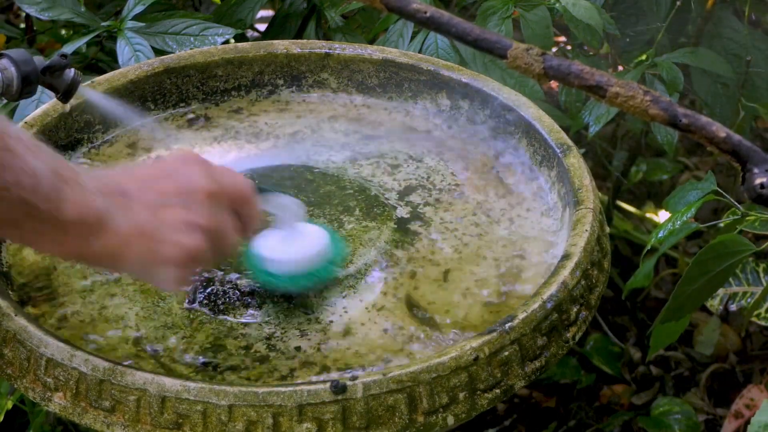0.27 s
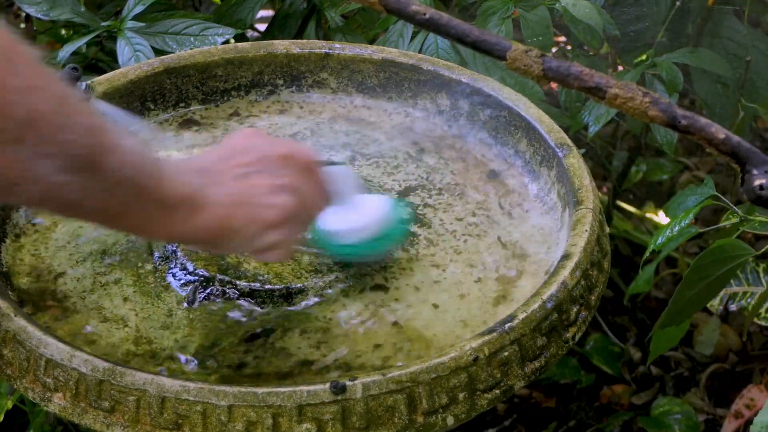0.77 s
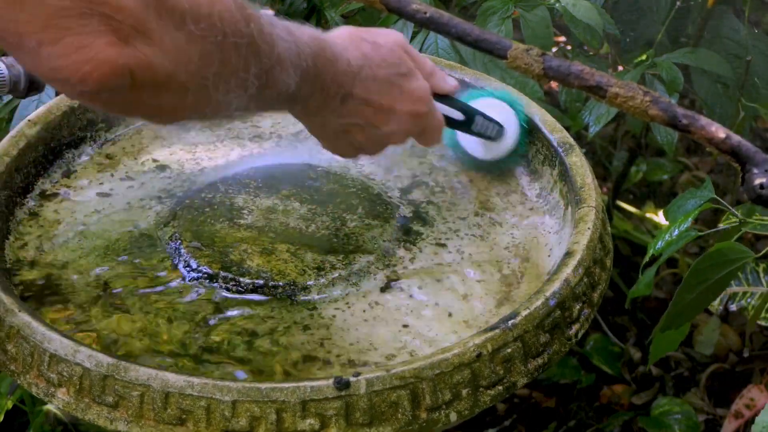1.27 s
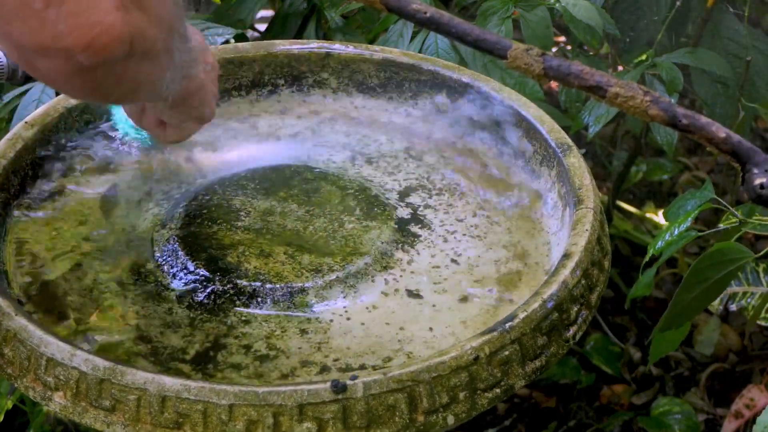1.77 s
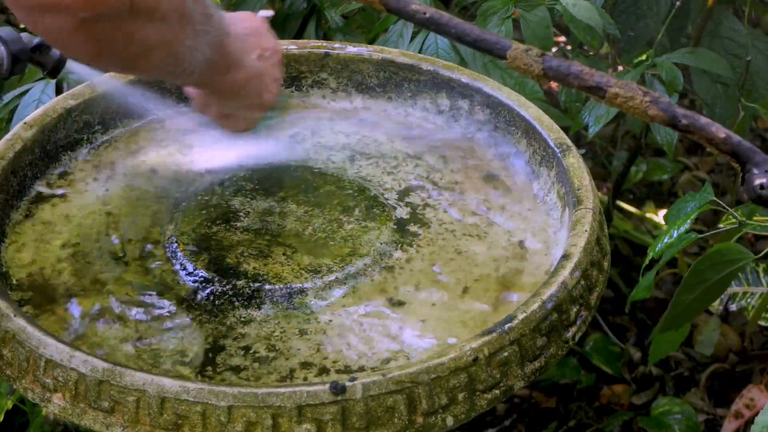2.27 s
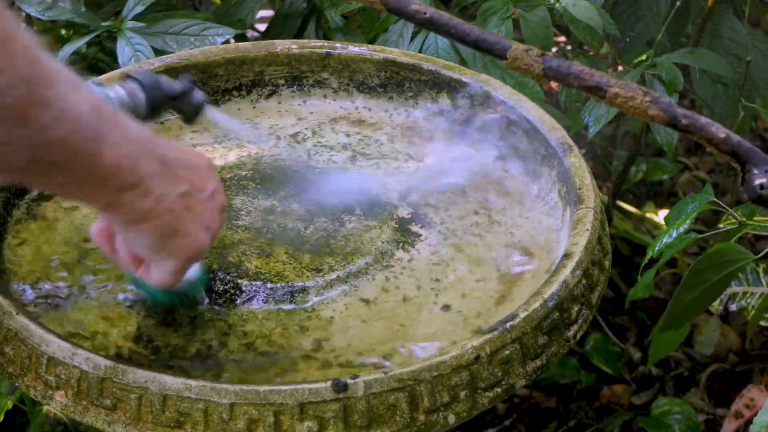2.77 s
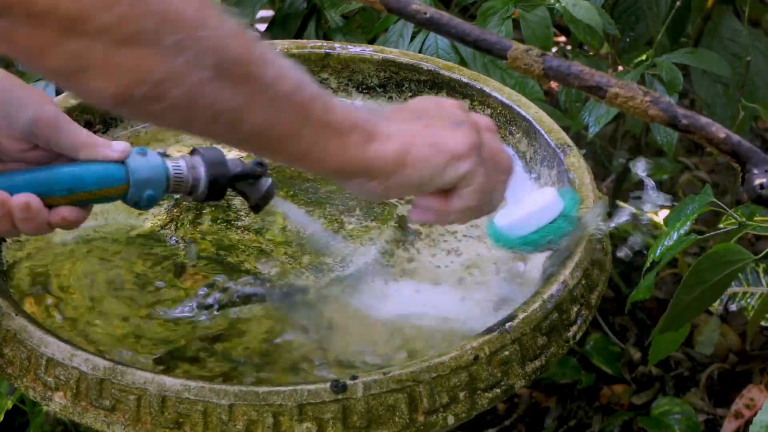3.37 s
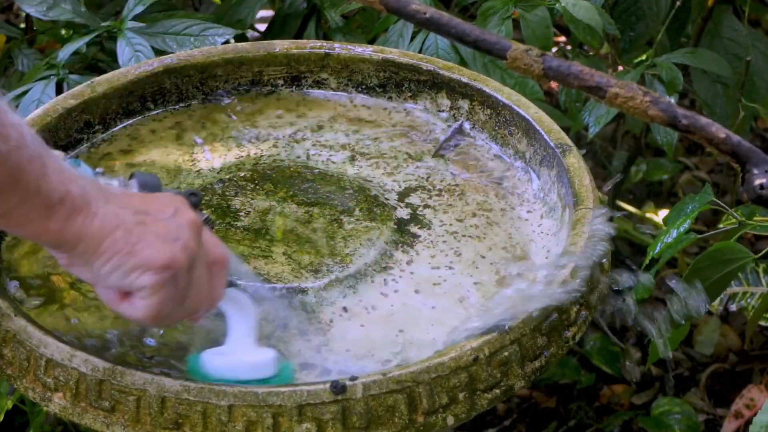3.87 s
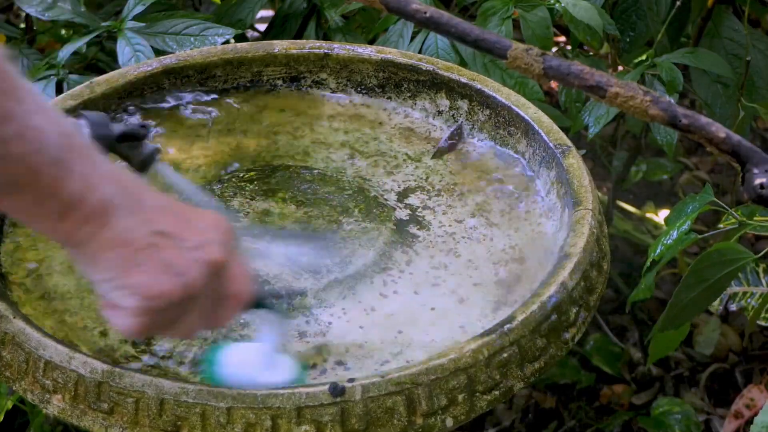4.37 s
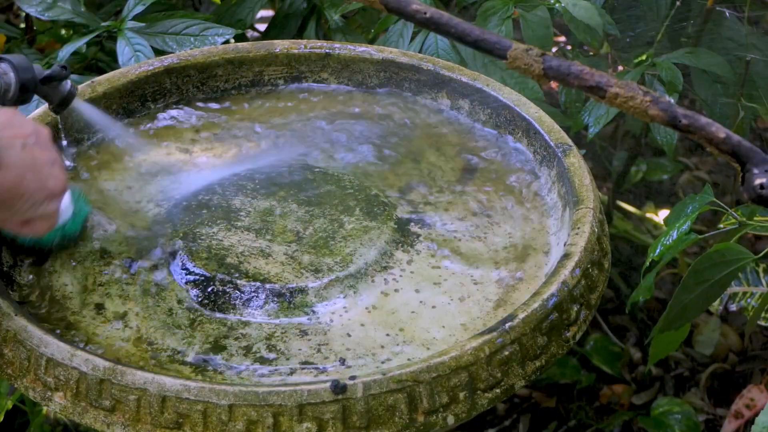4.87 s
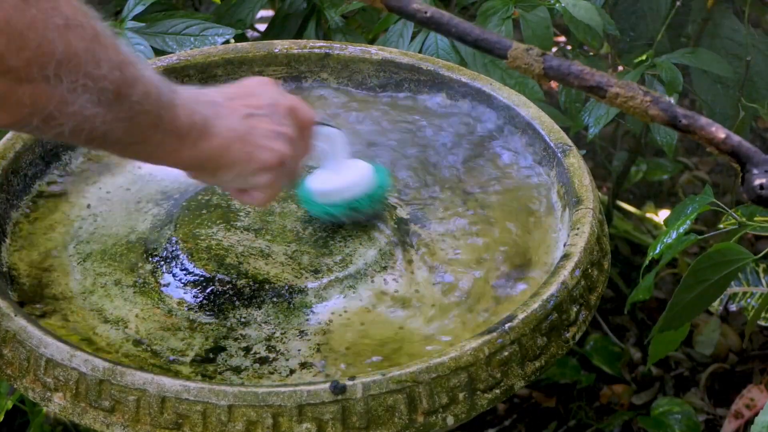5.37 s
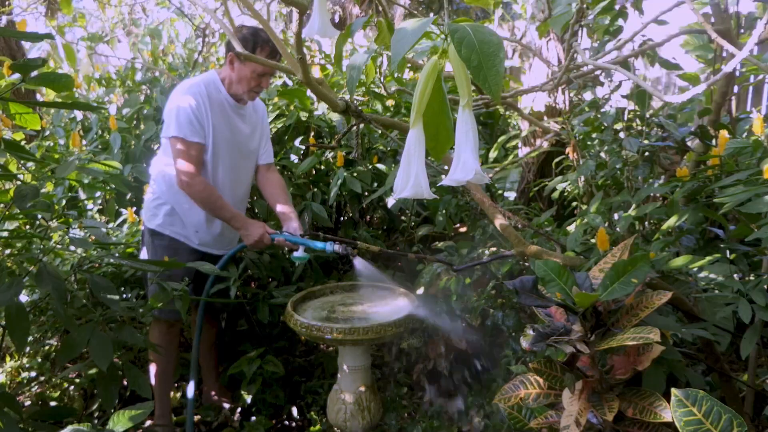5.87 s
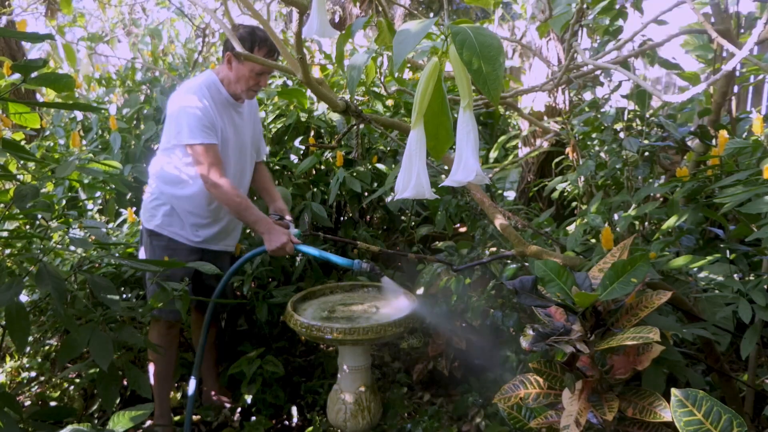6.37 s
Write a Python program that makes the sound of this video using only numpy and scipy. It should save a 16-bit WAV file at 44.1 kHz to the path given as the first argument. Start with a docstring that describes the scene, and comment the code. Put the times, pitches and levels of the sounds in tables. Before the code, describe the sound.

A hose jet hisses and splashes into a shallow concrete basin while a wet brush scrubs and knocks, then a smoother spray takes over.

```python
"""Hosing and scrubbing a bird bath

A garden, one microphone close to a shallow concrete basin. A hose jet hisses and crackles on the stone,
the pool fizzes, and a wet hand brush rasps, bumps and knocks. Near the end all this gives way at once to
a smoother, fuller spray fanning over the rim. Far behind lie a low murmur of air and a motor's hum."""
import sys
import numpy as np
from scipy import signal
from scipy.fft import rfft, irfft, next_fast_len
from scipy.io import wavfile
from scipy.ndimage import uniform_filter1d

SR = 44100
rng = np.random.default_rng(int(sys.argv[2]) if len(sys.argv) > 2 else 0)


def unload_wav(signal):
    """Save mono or channel-first audio to the path in sys.argv[1] as 16-bit WAV at rate SR, clipped to [-1, 1]."""
    wavfile.write(
        sys.argv[1],
        SR,
        np.round(np.clip(np.atleast_2d(signal).T, -1, 1) * 32767).astype(np.int16),
    )


N = 291501
T = np.arange(N) / SR

# spectrum of the jet on the stone: (frequency [Hz], relative density [dB])
JET_SPECTRUM = [(600, -32), (1100, -21.5), (1500, -13), (2000, -13), (3200, -9.5), (4500, -3.5), (5000, -3),
                (6300, 1.5), (7100, 0), (7900, -3.5), (8900, 0.9), (11400, -0.5), (14300, -8.5),
                (16000, -9.5)]
# resonances of the plastic brush head: (frequency [Hz], width [Hz], relative gain [dB])
HEAD_MODES = [(900, 67, -11), (1410, 120, -6), (1670, 150, -3.5), (2500, 430, -15), (3025, 150, -1),
              (3555, 180, 3), (4420, 130, -4), (4780, 260, 1.5), (5800, 170, 2), (6460, 380, 3)]


def undb(db):
    """Decibels to gain."""
    return 10 ** (np.asarray(db) / 20)


def unit(x):
    """Scale to rms 1."""
    return x / np.sqrt(np.mean(x ** 2) + 1e-18)


def curves(table):
    """Each column after the first (time [s]) as a signal."""
    times, *columns = np.transpose(table)
    return [np.interp(T, times, column) for column in columns]


def walk(rate):
    """Random drift of rms 1, turning about rate times a second."""
    hold = max(int(SR / rate), 1)
    steps = np.repeat(rng.standard_normal(N // hold + 1), hold)
    return unit(uniform_filter1d(steps, hold)[:N])


def tone(hz):
    """A sine that wavers a little in pitch; rms 1."""
    pitch = hz * (1 + 0.01257 * walk(rate=12))
    return unit(np.sin(2 * np.pi * np.cumsum(pitch) / SR))


def shape(x, gain):
    """Filter by a gain that is a function of frequency."""
    size = next_fast_len(len(x) + 2048)
    hz = np.fft.rfftfreq(size, 1 / SR) + 1
    return irfft(rfft(x, size) * gain(hz), size)[:len(x)]


def colour(x, spectrum):
    """Filter by (frequency [Hz], gain [dB]) points; rms 1."""
    hz, db = np.transpose(spectrum)
    return unit(shape(x, lambda f: undb(np.interp(np.log(f), np.log(hz), db))))


def resonance(f, hz, width_hz):
    """Complex gain at f of one mode centred on hz."""
    return 1 / (1 + 1j * (f / hz - hz / f) * hz / width_hz)


def ringing(x, modes, direct):
    """A body's modes (frequency [Hz], width [Hz], gain [dB]) plus a share of direct sound; rms 1."""
    def body(f):
        return direct + sum(undb(db) * resonance(f, hz, width) for hz, width, db in modes)
    return unit(shape(x, body))


def flicker(x, depth_db, rate):
    """Narrow bands swell and fade on their own, as when a sheet of water breaks up; rms 1."""
    size = 512
    _, _, bands = signal.stft(x, nperseg=size)
    frames = max(int(2 * SR / size / rate), 1)
    drift = uniform_filter1d(rng.standard_normal(bands.shape), frames, axis=1)
    drift = unit(uniform_filter1d(drift, size=2, axis=0))
    _, flickering = signal.istft(bands * undb(depth_db * drift), nperseg=size)
    return unit(flickering[:len(x)])


def impacts(rate, spread_db):
    """Tiny random hits, rate a second, with sizes scattered in dB; rms 1."""
    hit = rng.random(N) < rate / SR
    size = undb(spread_db * np.clip(rng.standard_normal(N), -2.5, 2.5))
    return unit(hit * size * rng.choice([-1, 1], N))


def drops(rate, spread_db, burst_s):
    """Each drop bursts into a very short puff of droplets; rms 1."""
    puff = np.exp(-T[:1024] / burst_s)
    power = signal.fftconvolve(impacts(rate, spread_db) ** 2, puff)[:N]
    return unit(np.sqrt(np.abs(power)) * rng.standard_normal(N))


def swells(rows, source):
    """Bands of source swell and fade: (middle [s], length [s], level [dB], centre [Hz], width [Hz])."""
    out = np.zeros(N)
    for middle, length, db, hz, width_hz in rows:
        span = np.flatnonzero(np.abs(T - middle) < 1.5 * length)
        swell = np.exp(-np.abs(2 * (T[span] - middle) / length) ** 3)
        band = shape(source[span], lambda f: resonance(f, hz, 2 * width_hz) ** 2)  # steep skirts
        out[span] += undb(db) * swell * unit(band)
    return out


def jet():
    """Mist hisses evenly; the harder the jet hits the stone, the more single drops crackle."""
    # the jet wanders: loud and bright on bare stone, softer and splashier in the pool and by the rim
    # (time [s], hiss level [dB], splash relative to hiss [dB])
    jet_levels = [(0, -35.5, -2.5), (.17, -35, -4.5), (.47, -36.5, -4.3), (.78, -35.5, -4.5),
                  (1, -38, -1.5), (1.35, -38.5, -1.5), (1.67, -36, -2), (1.75, -32.2, -5),
                  (2.45, -31.5, -4.5), (3.1, -39.5, 0.5), (3.42, -34.5, -2.5), (3.75, -37, 0.1),
                  (4.4, -41, 1.3), (4.72, -34.5, -5), (5.23, -35.5, -1.5), (5.5, -39, -1.5),
                  (5.85, -39, .5)]
    # the bowl tints the water: (frequency [Hz], width [Hz], relative gain [dB])
    bowl_modes = [(1680, 29, -1.5), (3130, 110, -4), (4400, 97, -20), (9800, 150, -26)]
    hiss_db, splash_db = curves(jet_levels)
    force = np.clip(0.37 + 0.041 * (hiss_db + 30), .1, .9)
    mist = flicker(rng.standard_normal(N), depth_db=3.0, rate=35)
    crackle = drops(rate=1200, spread_db=4, burst_s=0.00061)
    crackle = unit(shape(crackle, lambda f: 1 / np.hypot(1, (f / 12500) ** 3)))  # duller than the mist
    water = colour(np.sqrt(1 - force) * mist + np.sqrt(force) * crackle, JET_SPECTRUM)
    water = ringing(water, bowl_modes, direct=1)
    water *= undb(0.72 * walk(rate=40))  # the stream breaks into uneven slugs
    splash = shape(water, lambda f: 1 / (1 + (f / 7700) ** 10))
    hiss = water - splash
    splash_gain = undb(hiss_db + splash_db + .5 * walk(rate=25))
    return unit(hiss) * undb(hiss_db) + unit(splash) * splash_gain


def bubbles(count, low_hz, high_hz, decay_cycles, spread_db, glide):
    """Bubbles in the shallow pool ring briefly and rise in pitch as they surface; rms 1."""
    out = np.zeros(N)
    for when, smallness, strength in rng.random((count, 3)):
        hz = low_hz * (high_hz / low_hz) ** smallness
        start = int(when * N)
        samples = min(int(5 * decay_cycles / hz * SR), N - start)
        age = T[:samples] * hz / decay_cycles  # in decay times
        ring = np.exp(-age) * np.sin(2 * np.pi * decay_cycles * age * (1 + glide * age))
        out[start:start + samples] += undb(-spread_db * np.log(strength + 0.046)) * ring
    return unit(out)


def garden():
    """Far from the microphone: murmuring air, a motor's wavering hum, a drone that comes and goes."""
    # still garden air: (frequency [Hz], relative density [dB])
    air_spectrum = [(22, -10), (33, -14), (45, -6.5), (75, -1), (135, 0.5), (180, -3.5), (260, -0.5),
                    (340, 0), (430, -4.5), (650, -5), (850, -2.5), (1400, -5.5), (3000, -16.5)]
    # tones of the distant motor: (frequency [Hz], level [dB])
    motor_tones = [(120, -75.5), (353, -76), (511, -75.5)]
    # rise and fall of the low drone: (time [s], level [dB])
    drone_levels = [(0, -74), (.65, -77), (1.58, -67), (2.2, -77), (2.7, -63), (3.2, -75), (3.75, -65),
                    (4.5, -69), (5.4, -76), (6.6, -85)]
    air = colour(rng.standard_normal(N), air_spectrum) * undb(-56 + 2.1 * walk(rate=9.7))
    hum = sum(undb(db + 1.3 * walk(rate=4.32)) * tone(hz) for hz, db in motor_tones)
    drone_db, = curves(drone_levels)
    drone = undb(drone_db + 3.2 * walk(rate=6)) * tone(hz=95.5)
    return air + hum + drone


def brush():
    """Bristles flick on rough concrete and ring the head; water among them tunes the rasp and gurgles."""
    # brush strokes: (middle [s], length [s], level [dB], centre of the rasp [Hz])
    strokes = [(.108, 0.084, -37, 3300), (0.274, 0.062, -33, 4800), (0.384, .064, -30, 3600),
               (0.553, .09, -33.5, 4140), (0.677, 0.088, -32, 3500), (.79, .075, -37, 3820),
               (0.869, 0.072, -40.5, 3220), (1.405, 0.21, -46, 1770), (1.752, 0.063, -42.5, 3300),
               (3.057, 0.048, -49, 3200), (3.202, .07, -42, 3500), (4.295, 0.073, -43, 3050),
               (5.053, .035, -39, 1980), (5.1, .041, -38.5, 4040), (5.21, 0.12, -46, 2900),
               (5.506, 0.18, -43.5, 2460), (5.712, 0.11, -41, 2240), (5.81, 0.043, -41.5, 2820)]
    # water pushed by the brush: (middle [s], length [s], level [dB], pitch [Hz])
    gurgles = [(1.98, 0.12, -45.5, 2410), (3.558, .09, -50, 1390), (3.639, .027, -45.5, 1440),
               (4.11, 0.17, -55, 1460), (5.232, .04, -44.5, 1430), (5.36, 0.022, -43, 2240),
               (5.399, 0.046, -48, 2620)]
    flicks = impacts(rate=3000, spread_db=1.5) + .5 * rng.standard_normal(N)
    flicks = shape(flicks, lambda f: 1 / np.hypot(1, (1250 / f) ** 6))  # thin bristles carry no bass
    bristles = ringing(flicker(flicks, depth_db=3.5, rate=30), HEAD_MODES, direct=1.0)
    # harder pressed bristles widen the rasp
    rasp_bands = [(s, length, db, hz, 0.39 * hz * 2 ** (0.04 * (db + 41)))
                  for s, length, db, hz in strokes]
    gurgle_bands = [(s, length, db, hz, 0.12 * hz) for s, length, db, hz in gurgles]
    return swells(rasp_bands + gurgle_bands, bristles)


def spatters():
    """Dense hard drops fly where the jet meets the brush or the rim."""
    # bursts of spatter: (middle [s], length [s], level [dB], centre [Hz])
    bursts = [(.26, .02, -29, 6500), (0.552, 0.064, -29.5, 8400), (2.052, 0.14, -30, 7800),
              (2.27, .02, -29, 9500), (3.476, .04, -30.5, 8000), (3.873, 0.12, -32.5, 7000),
              (4.056, 0.1, -32, 6740), (4.21, 0.071, -36.5, 7400), (4.785, 0.14, -32, 7900),
              (5.042, 0.039, -32, 7000), (5.106, 0.043, -29.5, 8500), (5.235, 0.066, -30.5, 7600)]
    hits = drops(rate=2200, spread_db=5.0, burst_s=0.00037) + 0.75 * rng.standard_normal(N)
    bands = [(s, length, db, hz, 0.84 * hz) for s, length, db, hz in bursts]
    return swells(bands, colour(hits, JET_SPECTRUM))


def bumps():
    """The brush thuds softly against the basin as it turns; the last, higher one is a small plop of water."""
    # dull thuds, the last a water plop: (middle [s], length [s], level [dB], centre [Hz])
    thuds = [(0.75, .039, -56, 267), (1.285, .03, -51, 248), (4.206, 0.028, -53.5, 830)]
    width_hz = 51
    return swells([(*thud, width_hz) for thud in thuds], rng.standard_normal(N))


def knocks():
    """The plastic head hits the basin and rings briefly, its contact spread out by wet bristles."""
    # blows of the head: (time [s], peak level [dB])
    blows = [(3.201, -27.5), (3.53, -30), (3.614, -20.5), (5.812, -34)]
    age = T[:SR // 8]
    out = np.zeros(N)
    for s, db in blows:
        contact = rng.standard_normal(len(age)) * age * np.exp(-age / 0.0024)
        contact = shape(contact, lambda f: 1 / (1 + 1j * (f / 4000 - 700 / f)))
        ring = ringing(contact, HEAD_MODES, direct=0.13)
        start = int(s * SR)
        out[start:start + len(age)] += undb(db) * ring / np.abs(ring).max()
    return out


def fanning_spray():
    """Fine spray glances off the rim into the leaves: many small drops, an even rush."""
    # strength of the spray: (time [s], level [dB])
    spray_levels = [(5.89, -28.5), (6, -31), (6.22, -30), (6.44, -32), (6.57, -28.5), (6.6, -32)]
    # its spectrum: (frequency [Hz], relative density [dB])
    spray_spectrum = [(400, -36), (750, -18.5), (1000, -17.5), (1450, -13), (2000, -9.5), (2500, -10),
                      (4100, -2), (6300, 0), (7100, -1), (7900, -5.5), (9500, -1.5), (11300, -7),
                      (14500, -15.5), (16000, -19)]
    level_db, = curves(spray_levels)
    mist = flicker(rng.standard_normal(N), depth_db=2.0, rate=38)
    patter = drops(rate=1800, spread_db=2.5, burst_s=0.00059)
    return colour(mist + 0.58 * patter, spray_spectrum) * undb(level_db)


def scene():
    """Close scrubbing gives way to the fanning spray over the distant garden; mono on both channels."""
    spray_start_s, crossfade_s = 5.875, 0.0022
    fanning = np.clip((T - spray_start_s) / crossfade_s, 0, 1)
    fizz = bubbles(count=2000, low_hz=3098, high_hz=10980, decay_cycles=27, spread_db=3.5, glide=.004)
    scrubbing = jet() + undb(-52.5) * fizz + brush() + spatters() + knocks() + bumps()
    mono = (1 - fanning) * scrubbing + fanning * fanning_spray() + garden()
    return np.array([mono, mono])


def record(dry):
    """The recorder cuts the top treble steeply."""
    top_hz = 15750
    return signal.sosfilt(signal.ellip(12, .1, 80, top_hz, fs=SR, output="sos"), dry)


dry = scene()
out = record(dry)
unload_wav(out)
```